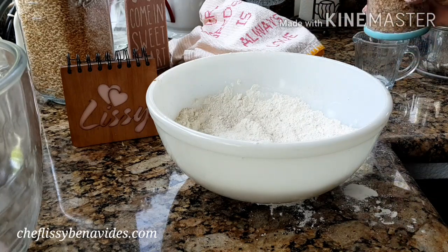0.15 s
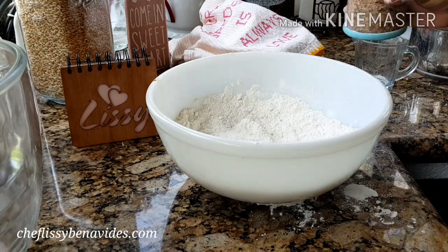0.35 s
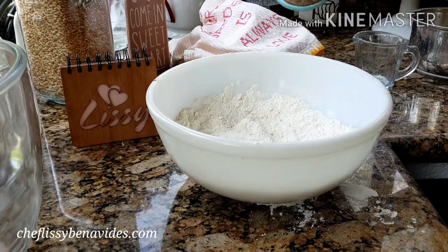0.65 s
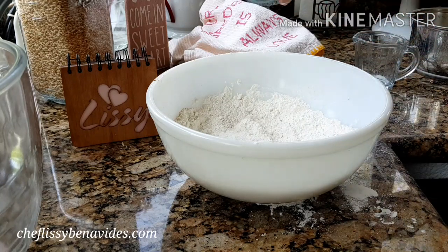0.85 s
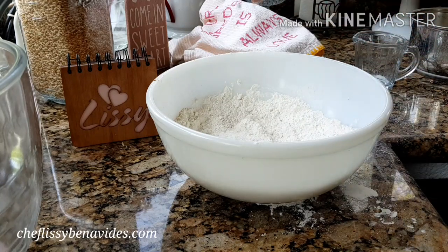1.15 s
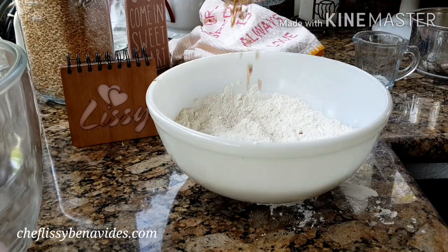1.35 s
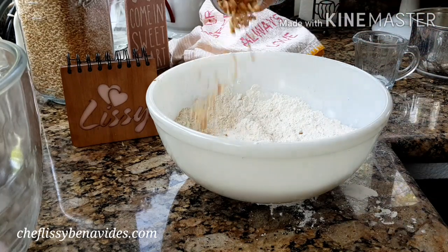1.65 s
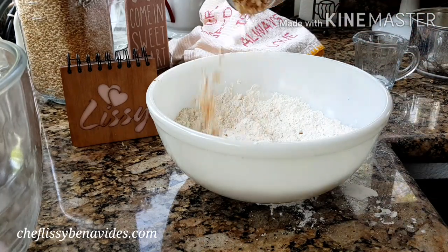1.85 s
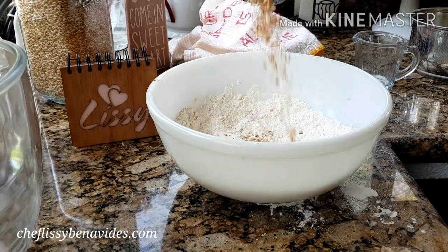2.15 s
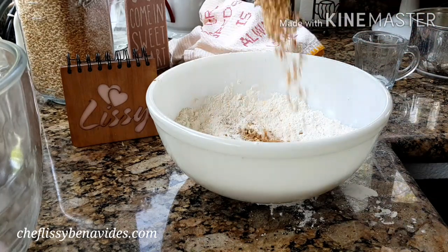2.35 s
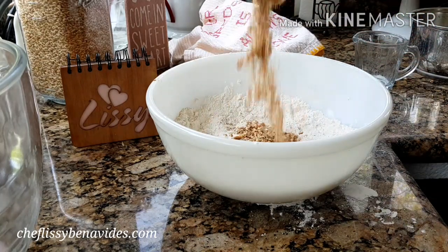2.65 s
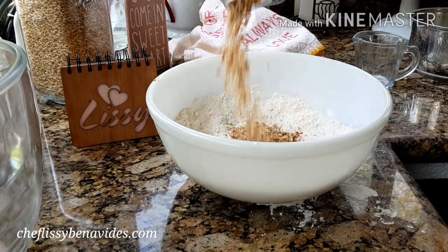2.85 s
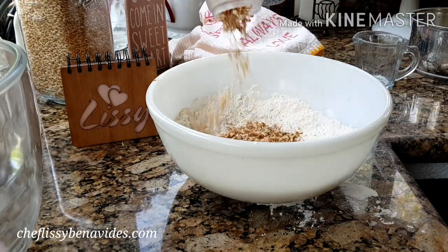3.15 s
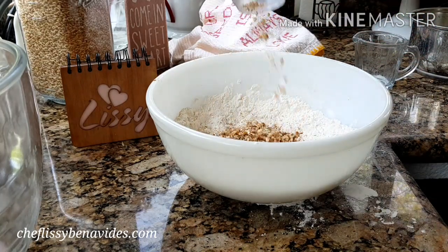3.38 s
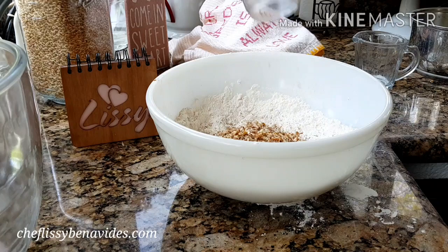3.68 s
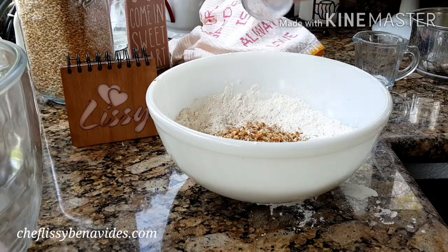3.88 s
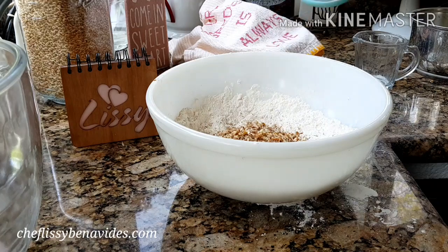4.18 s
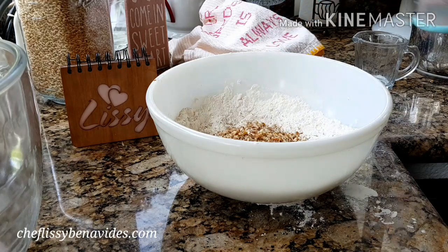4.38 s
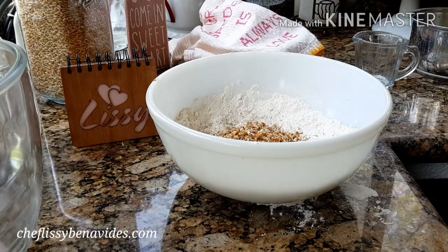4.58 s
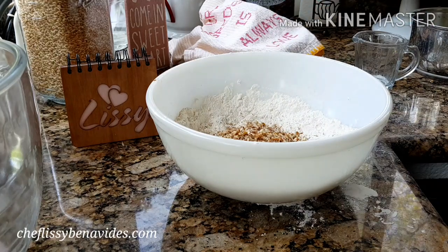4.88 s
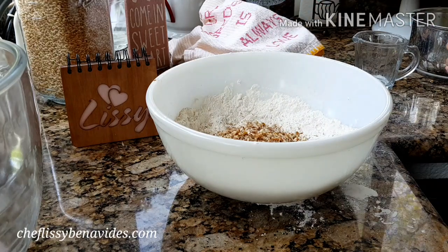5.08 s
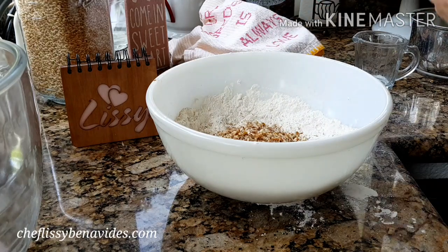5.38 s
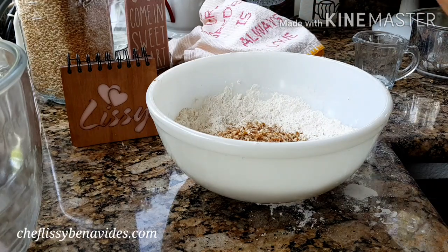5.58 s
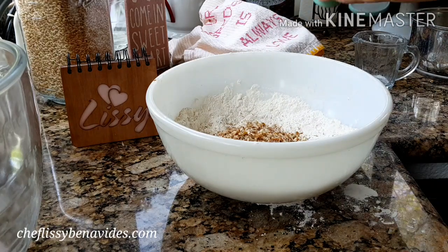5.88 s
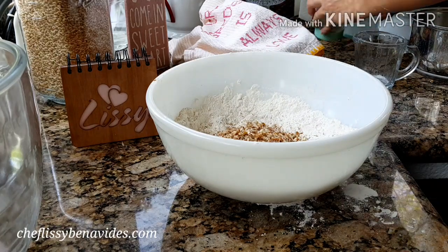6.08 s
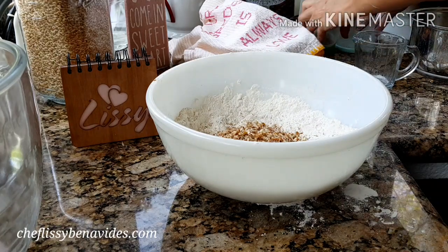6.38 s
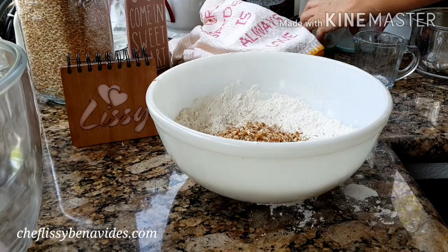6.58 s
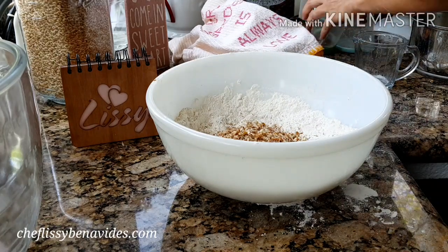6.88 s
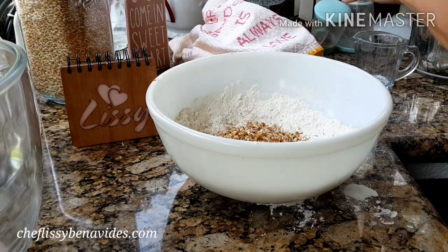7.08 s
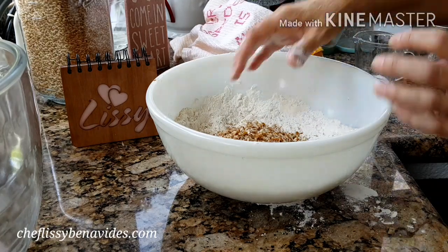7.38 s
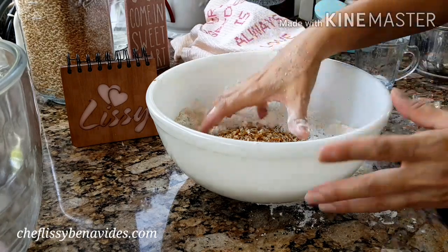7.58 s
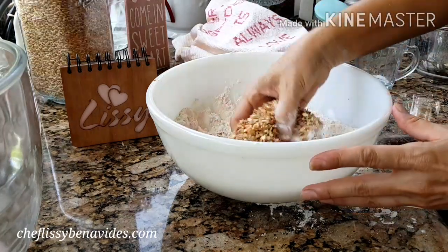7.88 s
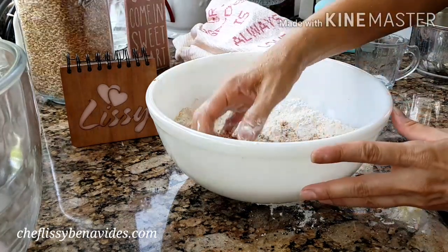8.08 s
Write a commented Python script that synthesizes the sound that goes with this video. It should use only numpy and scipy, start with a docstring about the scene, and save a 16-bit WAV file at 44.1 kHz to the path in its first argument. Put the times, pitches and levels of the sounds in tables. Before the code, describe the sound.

A quiet indoor kitchen with soft low room tone, slight hiss and a short reverberation, heard in stereo. A small hollow knock sounds at 0 seconds, with a fainter one near 0.3. From about 0.9 a few dry ticks begin, and from 1.5 to 3.4 chopped nuts are shaken out in roughly five pulses a second: crisp little ticks in the cup, grainy rustle, dull patter and soft thumps on flour, heaviest near 1.7-1.9 and 2.95. Low rumble swells around 3.3 and 3.8, with thin, faint squeaks. Light wooden rattles start at 4.4, then a hard, bright clack at 5.05 with knocks trailing to 5.5. A short slide near 5.7 leads to a second clack at 6.0-6.2 and a deep hollow thud at 6.44, the loudest, ringing off. From 7 to 8 a hand stirs very softly in the bowl.

```python
"""Chopped nuts shaken onto flour

A quiet kitchen, heard through two microphones: chopped nuts are shaken from a small cup onto flour in a
glass bowl. Random collisions excite short noisy resonances for the ticks in the cup, and duller ones for
the patter on the flour and the bowl's air. Something hollow and wooden, like a drawer, rattles, clacks
twice and shuts with a thud: each blow rings its box, panels, cabinet and fittings. Near the end a hand
stirs faintly in the bowl. Room tone, hiss, low swells and thin whistles, made of shaped noise, lie behind."""
import sys
import numpy as np
from scipy import signal
from scipy.fft import rfft, irfft
from scipy.io import wavfile

SR = 44100
rng = np.random.default_rng(int(sys.argv[2]) if len(sys.argv) > 2 else 0)


def generate_wav(sig):
    """Save sig (samples, or channels by samples) to the path in sys.argv[1] as 16-bit PCM at SR."""
    pcm = np.round(np.clip(np.atleast_2d(sig).T, -1, 1) * 32767).astype(np.int16)
    wavfile.write(sys.argv[1], SR, pcm)


N = 363546
TIME = np.arange(N) / SR  # seconds
FLAT = [(20, 0), (20000, 0)]  # white colour: pitch_hz, level_db


def from_db(db):
    """Decibels to gain."""
    return 10 ** (np.asarray(db) / 20)


def rms_one(x):
    """Scale to unit rms."""
    return x / np.sqrt(np.mean(x ** 2) + 1e-20)


def unit_energy(x):
    """Scale a response to unit energy per channel."""
    return rms_one(x) / np.sqrt(x.shape[-1])


def at_hz(points, hz):
    """Read a table on a log-frequency axis."""
    table_hz, value = np.transpose(points)
    return np.interp(np.log(np.maximum(hz, 1)), np.log(table_hz), value)


def gains(rows, fall_db_per_s):
    """Gain curve of swells (peak_s, rise_s, hold_s, level_db): each climbs 20 dB in rise_s, holds, dies away."""
    level_db = np.full(N, -200.)
    for peak_s, rise_s, hold_s, db in rows:
        climb_db = 20 * np.maximum(peak_s - TIME, 0) / rise_s
        fall_db = fall_db_per_s * np.maximum(TIME - peak_s - hold_s, 0)
        level_db = np.maximum(level_db, db - climb_db - fall_db)
    return from_db(level_db)


# Likeness of diffuse sound at the two microphones: pitch_hz [Hz], likeness [1 = identical, 0 = unrelated]
MICROPHONE_LIKENESS = [(100, 0.85), (300, 0.74), (550, 0.41), (1000, 0), (2000, 0), (16000, 0)]


def noise(spectrum, size=N):
    """Stereo noise of a given colour, alike at both microphones in the bass; rms 1."""
    hz = np.fft.rfftfreq(size, 1 / SR)
    alike = at_hz(MICROPHONE_LIKENESS, hz)
    mid, side = np.exp(2j * np.pi * rng.random((2, len(hz))))
    both = np.sqrt(1 + alike) * mid + np.sqrt(1 - alike) * side * [[1], [-1]]
    return rms_one(irfft(both * from_db(at_hz(spectrum, hz)), size))


def fading(t60, size):
    """Exponential decay by 60 dB in t60 seconds."""
    return np.exp(-np.log(1000) * TIME[:size] / t60)


def through(x, response):
    """Pass a signal through a mono or stereo response."""
    return signal.fftconvolve(np.atleast_2d(x), response, axes=-1)[:, :N]


def causal(spectrum, size):
    """Minimum-phase filter of a given colour: nothing sounds early, and a soft contact starts softly."""
    log_gain = np.log(from_db(at_hz(spectrum, np.fft.rfftfreq(size, 1 / SR))))
    cepstrum = irfft(log_gain, size)
    return np.exp(rfft(cepstrum * (1 + np.sign(np.fft.fftfreq(size)))))


def contact(spectrum, t60, size=8192):
    """One contact: a dense cluster of resonances that dies quickly; unit energy."""
    burst = noise(FLAT, size=size) * fading(t60, size)
    return unit_energy(irfft(rfft(burst) * causal(spectrum, size), size))


def hits(times, levels_db, spectrum, t60):
    """A fresh contact at every given time."""
    out = np.zeros((2, N))
    for start_s, db in zip(times, levels_db):
        at = int(start_s * SR)
        sound = contact(spectrum, t60)[:, :N - at]
        out[:, at:at + sound.shape[1]] += from_db(db) * sound
    return out


def clicks_at(times, levels_db):
    """One click at each given time."""
    out = np.zeros(N)
    out[(times * SR).astype(int)] = from_db(levels_db)
    return out


def ring(clicks, hz, t60):
    """A unit click sets a decaying sine of starting height 1 ringing."""
    r, w = np.exp(-np.log(1000) / (t60 * SR)), 2 * np.pi * hz / SR
    return signal.lfilter([0, np.sin(w)], [1, -2 * r * np.cos(w), r * r], clicks + 1e-18)


def resonate(x, hz, width_hz):
    """A resonance with gain 1 on top."""
    r = np.exp(-np.pi * width_hz / SR)
    feed = np.array([1, 0, -1]) * (1 - r * r) / 2
    return signal.lfilter(feed, [1, -2 * r * np.cos(2 * np.pi * hz / SR), r * r], x + 1e-18)


def struck(times, levels_db, modes, uneven_db):
    """Every blow excites each mode (pitch_hz, level_db, t60_s) with a strength of its own."""
    out = np.zeros(N)
    for k, (hz, db, t60) in enumerate(modes):
        strength_db = levels_db + db + uneven_db * rng.standard_normal(len(times))
        blows = clicks_at(times, strength_db)
        out += (-1) ** k * resonate(ring(blows, hz, t60), hz, hz / 2)
    return out


def cavity(resonances, size=4096):
    """Response of a few broad resonances side by side, alternating in sign; unit energy."""
    impulse = signal.unit_impulse(size)
    response = np.zeros(size)
    for k, (hz, width_hz, db) in enumerate(resonances):
        response += (-1) ** k * from_db(db) * resonate(impulse, hz, width_hz)
    return unit_energy(response)[None]


def collisions(level, per_s):
    """Random clicks of uneven size that come thicker as the flow grows; their rms follows level."""
    rate = per_s * (0.18 + level / level.max())  # clicks per second
    sizes = rms_one(from_db(3.5 * np.minimum(rng.exponential(1, N), 3)))
    signs = rng.choice([-1, 1], N)
    happens = rng.random(N) < rate / SR
    return level * sizes * signs * happens * np.sqrt(SR / rate)


def grains(level, spectrum, per_s, t60, count=6):
    """Collisions dealt among pieces that each ring in their own way."""
    clicks, piece = collisions(level, per_s), rng.integers(0, count, N)
    return sum(through(clicks * (piece == k), contact(spectrum, t60, size=2048)) for k in range(count))


# Reverberation of the kitchen: pitch_hz [Hz], t60_s [s]
KITCHEN_DECAY = [(100, 0.78), (500, 0.55), (1200, 0.43), (3000, 0.47), (8000, 0.35), (15000, 0.38)]


def kitchen(size=32768, count=9):
    """The room's response: a diffuse tail that builds up in a few ms, each octave with its own decay."""
    hz, t = np.fft.rfftfreq(size, 1 / SR), TIME[:size]
    white = rfft(noise(FLAT, size=size))
    octave = np.clip(np.log2(np.maximum(hz, 1) / 62.5), 0, count - 1)
    tail = np.zeros((2, size))
    for k in range(count):
        band = irfft(white * np.maximum(1 - abs(octave - k), 0))
        tail += band * fading(at_hz(KITCHEN_DECAY, 62.5 * 2 ** k), size)
    return unit_energy(tail * (1 - np.exp(-t / 0.00056)))


# Colour of the still room: pitch_hz [Hz], level_db [dB per Hz]
STILL_ROOM = [(13, -37), (22, -15), (43, -1), (103, -3.5), (141, -9), (184, -11), (264, -5), (378, -18.5),
              (505, -16.5), (675, -17.5), (839, -20), (969, -23.5), (1810, -24), (2670, -26.5), (7000, -34),
              (9100, -57), (15400, -120)]
# Colour of the microphone hiss: pitch_hz [Hz], level_db [dB per Hz]
MICROPHONE_HISS = [(5000, -31), (7500, -23.5), (9300, -5), (12000, 1), (16000, 1.5)]
# Swells of a soft low rumble: peak_s [s], rise_s [s], hold_s [s], level_db [dB]
RUMBLE_SWELLS = [(1.26, 0.1, .02, -62.5), (3.32, 0.041, 0.068, -52), (3.76, 0.086, 0.082, -47.5)]
# Colour of the low rumble: pitch_hz [Hz], level_db [dB per Hz]
RUMBLE_COLOUR = [(20, -34), (30, -30), (42, 0), (58, 16), (75, -33), (110, -6.5), (250, -27.5), (800, -82)]
ROOM_TONE_DB, HISS_DB, RUMBLE_FALL_DB_PER_S = -66.5, -70, 53


def background():
    """Steady room tone and hiss, with low noise that swells and dies away."""
    room_tone = from_db(ROOM_TONE_DB) * noise(STILL_ROOM)
    hiss = from_db(HISS_DB) * noise(MICROPHONE_HISS)
    rumble = gains(RUMBLE_SWELLS, RUMBLE_FALL_DB_PER_S) * noise(RUMBLE_COLOUR)
    return room_tone + hiss + rumble


# Faint squeaks and thin whistles:
# start_s [s], length_s [s], start_hz [Hz], end_hz [Hz], width_hz [Hz], level_db [dB, before the mix]
THIN_WHISTLES = [(1.546, 0.18, 1608, 1750, 397, -70.5), (1.76, 0.19, 1020, 950, 220, -70),
                 (2.194, 0.055, 1400, 1900, 400, -63.5), (3.649, 0.74, 3050, 2800, 610, -82.5),
                 (3.77, 0.18, 882, 892, 70, -71.5), (3.995, 0.243, 863, 891, 75, -65),
                 (4.11, 0.32, 1840, 1895, 130, -78.5), (5.885, 0.23, 1960, 1913, 396, -67.5),
                 (6.987, 0.16, 1745, 1780, 89.7, -79), (7.177, .16, 2137, 2246, 118.5, -81),
                 (7.53, 0.099, 1127, 1173, 81.2, -77)]


def whistles(room):
    """Narrow bands of noise glide in pitch, swell and fade, with the room's tail around them."""
    out = np.zeros(N)
    for start_s, length_s, start_hz, end_hz, width_hz, db in THIN_WHISTLES:
        progress = np.clip((TIME - start_s) / length_s, 0, 1)
        phase = 2 * np.pi * np.cumsum(start_hz + (end_hz - start_hz) * progress) / SR
        lowpass = signal.butter(2, width_hz / 2, fs=SR, output="sos")
        waver = rms_one(signal.sosfilt(lowpass, rng.standard_normal((2, N))))
        tone = waver[0] * np.cos(phase) + waver[1] * np.sin(phase)
        out += from_db(db) * np.sin(np.pi * progress) * tone
    return from_db(-0.5) * out + from_db(3.0) * through(out, room)


# Strokes of the fingers in the bowl: peak_s [s], rise_s [s], hold_s [s], level_db [dB, before the mix]
FINGER_STROKES = [(7.1, 0.27, 0.1, -70.5), (7.54, 0.28, 0.11, -69.5), (8.1, 0.11, 0.09, -72)]
# Colour of nuts rubbing, stirred or shaken: pitch_hz [Hz], level_db [dB per Hz]
RUSTLE_COLOUR = [(500, -26.5), (900, -5), (1200, 2), (1400, -2), (1600, 6), (2150, -0.5), (2700, 3.5),
                 (3500, -5), (6000, -10)]
STIR_FALL_DB_PER_S = 37.5


def fingers():
    """A hand stirs softly through flour and nuts, and the bowl's air answers; no room tail is added."""
    level = gains(FINGER_STROKES, STIR_FALL_DB_PER_S)
    rustle = from_db(-3.0) * grains(level, RUSTLE_COLOUR, per_s=3900, t60=0.018, count=3)
    bowl_air = resonate(collisions(level, per_s=1800), hz=555, width_hz=220)
    return rustle + from_db(13.5) * bowl_air


# Blows on the drawer, levels before the mix:
# start_s [s], hollow_db [dB], pitch_hz [Hz, hollow knock], thud_db [dB], clack_db [dB]
DRAWER_BLOWS = [(0.003, -53, 506, -59.5, -50.5), (0.018, -52.5, 537, -58.5, -54),
                (0.272, -59, 453, -88, -64), (4.385, -56.5, 444, -56, -55.5),
                (4.505, -54.5, 487, -59.5, -62), (4.558, -48.5, 479, -61, -63.5),
                (4.749, -52, 449, -65, -66.5), (4.903, -58, 474, -76, -76), (5.042, -46.5, 490, -47, -58),
                (5.047, -38, 506, -46.5, -44), (5.0514, -32.5, 532, -45.5, -42),
                (5.065, -39, 495, -49, -59), (5.111, -32.5, 474, -49.5, -60), (5.231, -37.5, 474, -58, -51),
                (5.41, -44, 488, -75, -61), (5.454, -52.5, 537, -67, -58.5), (5.554, -72, 580, -77, -60),
                (6.007, -46.5, 480, -53.5, -55.5), (6.075, -52, 445, -60.5, -63.5),
                (6.164, -36.5, 614, -36, -44.5), (6.178, -36, 461, -39, -42.5), (6.188, -26, 474, -45, -44),
                (6.441, -18, 486.4, -31, -60)]
# Modes of the drawer's panels: pitch_hz [Hz], level_db [dB], t60_s [s]
PANEL_MODES = [(130, -17.5, 1), (332, 0, 0.39), (392, -16.5, 0.74), (474, 4, 0.69), (547, 8.5, 0.68),
               (627, -2.5, 0.91), (656, -20.5, 0.14), (756, 0, 0.16), (836, -16, 0.56), (1010, -17.5, 0.13),
               (930, -21, 0.9), (1213, -26.5, 0.11), (1370, -29.5, 0.25)]
# Low modes of the cabinet: pitch_hz [Hz], level_db [dB], t60_s [s]
CABINET_MODES = [(56, -6.5, 0.21), (70, -7, 0.73), (103, -4.5, .2), (137, -1.5, 0.46), (157.6, -2, 0.22),
                 (196.5, -5.5, 0.31), (248, -10.5, 0.24)]
# Short-lived modes of the drawer's front: pitch_hz [Hz], level_db [dB], t60_s [s]
FRONT_MODES = [(348, 1.5, 0.08), (713, -5.5, 0.029), (765, -7, 0.027), (920, -2, 0.058), (977, -8.5, 0.079),
               (1152, 0, 0.065), (1253, -10.5, 0.096), (1484, -14, 0.048), (1750, -29.5, 0.043),
               (1900, -30, 0.053), (2800, -31.5, 0.096)]
# Colour of the dull thud: pitch_hz [Hz], level_db [dB per Hz]
THUD_COLOUR = [(100, -27.5), (200, -6), (330, -5.5), (400, -4.5), (560, 3.5), (720, -0.5), (950, -2),
               (1250, -6), (1550, -15), (1880, -18), (2150, -31), (2700, -38.5), (4000, -41), (8000, -46)]
# The cabinet's boom follows the force of a blow: its level for a firm blow, and dB per dB
FIRM_BLOW_DB, BOOM_DB, BOOM_FOLLOWS = -38.5, -44, 1.16


def drawer_body(room):
    """Each blow sounds the hollow box at its own pitch, shakes the cabinet and leaves the panels ringing."""
    start_s, hollow_db, pitch_hz, thud_db, clack_db = np.transpose(DRAWER_BLOWS)
    force_db = (hollow_db + clack_db) / 2
    boom_db = BOOM_DB + BOOM_FOLLOWS * (force_db - FIRM_BLOW_DB)
    hollow = np.zeros(N)
    for blow_s, db, hz in zip(start_s, hollow_db, pitch_hz):
        hollow += ring(clicks_at(blow_s, db + 4.0), hz, t60=0.096)
    # the box takes a few cycles to build up
    hollow = signal.sosfilt(signal.butter(2, [370, 640], "band", fs=SR, output="sos"), hollow)
    panels = from_db(-25.0) * struck(start_s, hollow_db, PANEL_MODES, uneven_db=2.0)
    boom = from_db(-4.5) * struck(start_s, boom_db, CABINET_MODES, uneven_db=4.0)
    # the front rings with a few strong modes among many weak ones
    thud = from_db(-5.5) * struck(start_s, thud_db, FRONT_MODES, uneven_db=4.0)
    thud = thud + from_db(27.0) * hits(start_s, thud_db, THUD_COLOUR, t60=0.059)
    tail = through(from_db(-6.5) * hollow + from_db(-1.0) * thud + from_db(-6.0) * boom, room)
    # box and panels are a little louder in the left microphone
    return (hollow + panels) * from_db([[1.3], [-1.3]]) + boom + thud + tail


# Brightness of a clack, strongest in the hardest: clack_db [dB], snap_db [dB above the clack]
SNAP_BY_CLACK = [(-60, -8), (-49, -11), (-45, 3)]
# Colour of the clack: pitch_hz [Hz], level_db [dB per Hz]
CLACK_COLOUR = [(200, -16), (500, 4), (800, -13.5), (1250, -2), (1700, -3), (2000, -5.5), (2450, -2),
                (3100, -14.5), (5000, -28), (9000, -46)]
# Colour of the bright snap: pitch_hz [Hz], level_db [dB per Hz]
SNAP_COLOUR = [(1500, -30), (3000, 0), (4300, 3), (5600, 3), (6700, 3), (8200, -3.5), (9500, 3.5),
               (11500, -1.5), (15500, -15)]
# Modes of the metal fittings: pitch_hz [Hz], level_db [dB], t60_s [s]
FITTING_MODES = [(1710, -38, 0.22), (1683, -18.5, 0.33), (2266, -16, .38), (2360, -10, 0.19),
                 (3050, -15.5, .2), (3740, -34.5, 0.38), (3850, -19.5, .27), (5240, -22, 0.29),
                 (10150, -17, 0.24), (9943, -17, 0.21)]
# Short slides between the blows: peak_s [s], rise_s [s], hold_s [s], level_db [dB, before the mix]
DRAWER_SLIDES = [(4.43, .05, .01, -65), (5.72, 0.1, 0.013, -54.5), (6.39, 0.24, 0.034, -61.5)]
SLIDE_FALL_DB_PER_S = 145


def drawer_clatter(room):
    """Blows add a clack, a bright snap and a ring of the fittings; a slide is a run of tiny slips."""
    start_s, _, _, _, clack_db = np.transpose(DRAWER_BLOWS)
    snap_db = clack_db + np.interp(clack_db, *np.transpose(SNAP_BY_CLACK))
    clack = from_db(27.5) * hits(start_s, clack_db, CLACK_COLOUR, t60=0.044)
    snap = from_db(23.0) * hits(start_s, snap_db, SNAP_COLOUR, t60=0.031)
    metal = from_db(-8.5) * struck(start_s, snap_db, FITTING_MODES, uneven_db=0.0)
    slips = gains(DRAWER_SLIDES, SLIDE_FALL_DB_PER_S)
    slide = from_db(-6.0) * grains(slips, CLACK_COLOUR, per_s=3400, t60=0.013, count=5)
    slide += from_db(-10.5) * grains(slips, SNAP_COLOUR, per_s=830, t60=0.018, count=5)
    tail = through(from_db(3.0) * clack + from_db(-1.0) * snap + from_db(-3.5) * slide, room)
    return clack + snap + metal + slide + tail


# Shakes of the cup, about five a second, levels before the mix:
# peak_s [s], rise_s [s], ticking_db [dB, in the cup], patter_db [dB, in the bowl], bulk_db [dB, of the dose]
CUP_SHAKES = [(0.95, .1, -68, -96, -94), (1.098, .015, -67, -90, -75), (1.49, 0.12, -69.5, -72, -75),
              (1.701, 0.098, -64.5, -61.5, -58.5), (1.907, 0.16, -67, -58, -64),
              (2.115, 0.11, -68, -62, -72.5), (2.315, 0.21, -64.5, -65.5, -67),
              (2.521, 0.16, -65, -59, -66), (2.743, 0.14, -67.5, -62, -76.5),
              (2.95, 0.1, -61.5, -58.5, -66), (3.144, 0.15, -66.5, -62.5, -66.5),
              (3.36, 0.15, -75.5, -73, -85)]
# The main mass of nuts slips out at once and sinks into the flour:
# peak_s [s], rise_s [s], hold_s [s], level_db [dB, before the mix]
MAIN_MASS = [(2.955, .08, 0.036, -53.5)]
# Lumps of nuts dropping onto the heap: start_s [s], level_db [dB, before the mix]
NUT_LUMPS = [(1.687, -52), (1.721, -47), (1.844, -52.5), (1.914, -42.5), (2.108, -51.5), (2.495, -51),
             (2.957, -51), (2.991, -57)]
# The heap of flour yielding: pitch_hz [Hz], width_hz [Hz], level_db [dB]
FLOUR_HEAP = [(197, 122, -1.5), (259, 110, 2), (340, 91, -4)]
# Air in the bowl: pitch_hz [Hz], width_hz [Hz], level_db [dB]
BOWL_AIR = [(359, 54, -13.5), (610, 90, -2.5), (655, 127, -6.5), (950, 52, -22.5), (1210, 35, -23)]
# Each dose runs briefly at full flow, then dies away
DOSE_HOLD_S, CUP_FALL_DB_PER_S, LANDING_FALL_DB_PER_S = 0.014, 124, 100
# The dose's bulk sets how much the pieces rub and how heavily they land
RUB_DB, WEIGHT_DB = -3.5, -1.5


def nuts_landing(room):
    """With each shake, pieces land dully on the flour and sound the bowl's air; lumps drop among them."""
    doses = [(peak_s, rise_s, DOSE_HOLD_S, bulk_db + WEIGHT_DB) for peak_s, rise_s, _, _, bulk_db in CUP_SHAKES]
    patter = [(peak_s, rise_s, DOSE_HOLD_S, db) for peak_s, rise_s, _, db, _ in CUP_SHAKES]
    weight = gains(doses + list(MAIN_MASS), LANDING_FALL_DB_PER_S)
    landing = gains(patter, LANDING_FALL_DB_PER_S)
    lump_s, lump_db = np.transpose(NUT_LUMPS)
    thumps = from_db(-4.0) * through(collisions(weight, per_s=1500), cavity(FLOUR_HEAP))
    pats = from_db(-2.0) * collisions(landing, per_s=420)
    pats += from_db(14.5) * clicks_at(lump_s, lump_db)
    direct = thumps + through(pats, cavity(BOWL_AIR))
    return direct + from_db(-5.0) * through(direct, room)


# Single pieces striking the cup, and light taps: start_s [s], level_db [dB, before the mix]
SINGLE_TICKS = [(0.0742, -55), (0.9573, -58), (1.1, -53.5), (1.3631, -56), (1.53, -63), (1.7026, -64),
                (1.722, -58), (2.291, -59), (2.42, -59), (2.9477, -59), (3.377, -64.5), (5.641, -60),
                (5.6712, -55.5), (7.503, -61)]
# Colour of a tick against the cup: pitch_hz [Hz], level_db [dB per Hz]
TICK_COLOUR = [(1500, -44), (2900, 9), (3600, -1), (4500, 6.5), (6200, 7.5), (8000, 0.5), (9600, 8.5),
               (12000, 4.5), (15500, -8)]


def nuts_rattling(room):
    """With each shake, pieces rub on each other and tick against the cup; single ticks stand out."""
    rubs = [(peak_s, rise_s, DOSE_HOLD_S, bulk_db + RUB_DB) for peak_s, rise_s, _, _, bulk_db in CUP_SHAKES]
    ticks = [(peak_s, rise_s, DOSE_HOLD_S, db) for peak_s, rise_s, db, _, _ in CUP_SHAKES]
    rubbing = gains(rubs, CUP_FALL_DB_PER_S)
    ticking = gains(ticks, CUP_FALL_DB_PER_S)
    tick_s, tick_db = np.transpose(SINGLE_TICKS)
    rustle = from_db(3.0) * grains(rubbing, RUSTLE_COLOUR, per_s=230, t60=0.012, count=10)
    crackle = from_db(-1.5) * grains(ticking, TICK_COLOUR, per_s=420, t60=0.014, count=8)
    singles = from_db(20.0) * hits(tick_s, tick_db, TICK_COLOUR, t60=0.0079)
    direct = rustle + crackle + singles
    return direct + from_db(-3.0) * through(direct, room)


def scene():
    """All sources in the kitchen."""
    room = kitchen()
    behind = background() + whistles(room)
    drawer = drawer_body(room) + drawer_clatter(room)
    nuts = fingers() + nuts_landing(room) + nuts_rattling(room)
    return behind + drawer + nuts


NOTCH_DEPTH, CUTOFF_HZ = 0.79, 15600  # depth of the treble notch (0-1); top of the microphones' range


def record(dry):
    """The right microphone is brighter than the left; both have a deep notch in the treble and a cut top."""
    left, right = dry
    left = left - 0.5 * resonate(left, hz=5400, width_hz=5300)
    right = right + 0.61 * resonate(right, hz=5860, width_hz=4500)
    both = np.array([left, right])
    both = both - NOTCH_DEPTH * resonate(both, hz=7394, width_hz=1860)
    both = both + 0.5 * resonate(both, hz=9480, width_hz=590)  # a narrow lift above the notch
    return signal.sosfilt(signal.ellip(12, 0.1, 70, CUTOFF_HZ, fs=SR, output="sos"), both)


dry = scene()
out = record(dry)
generate_wav(out)
```